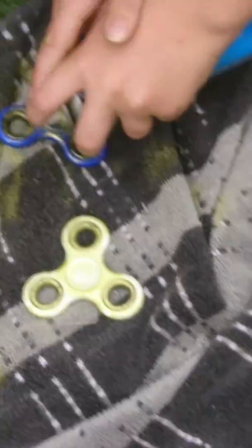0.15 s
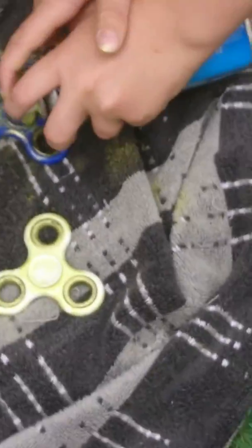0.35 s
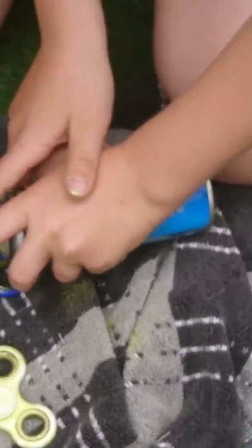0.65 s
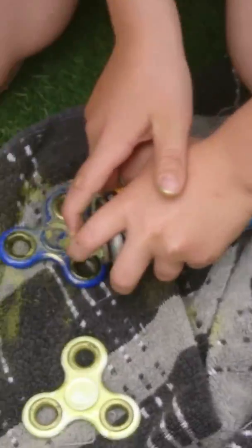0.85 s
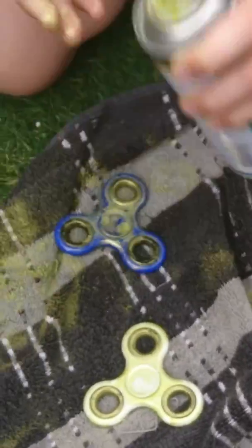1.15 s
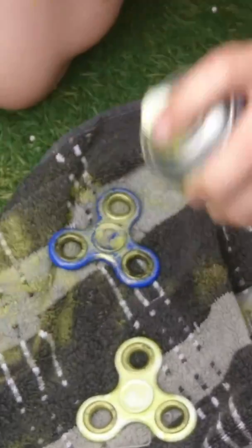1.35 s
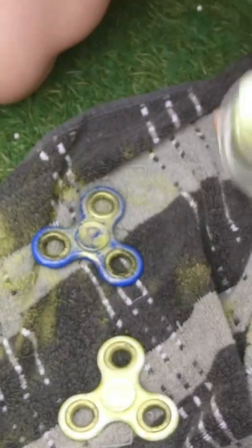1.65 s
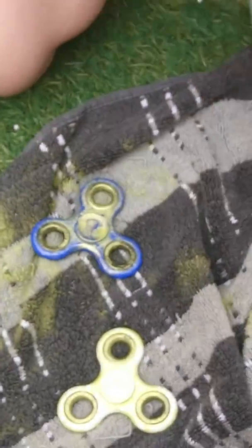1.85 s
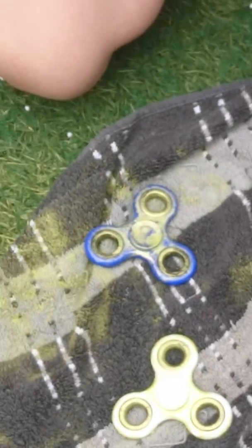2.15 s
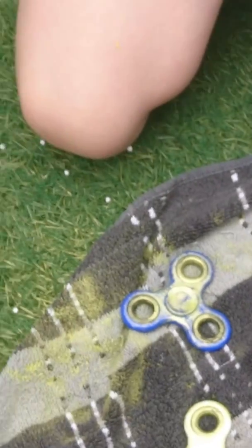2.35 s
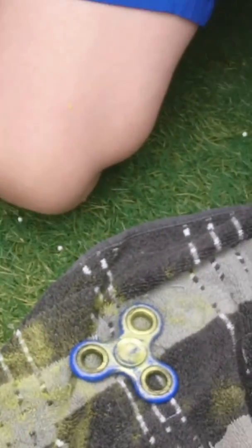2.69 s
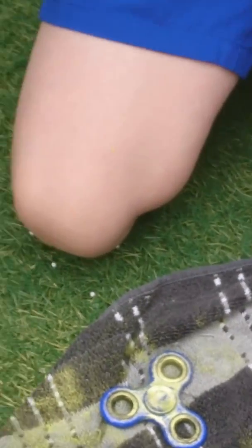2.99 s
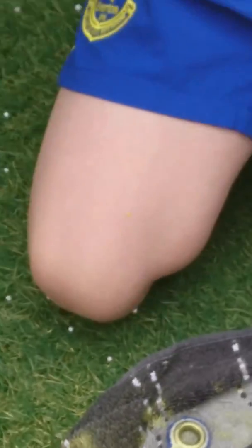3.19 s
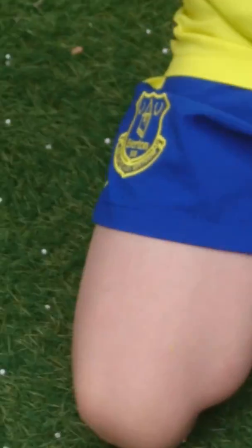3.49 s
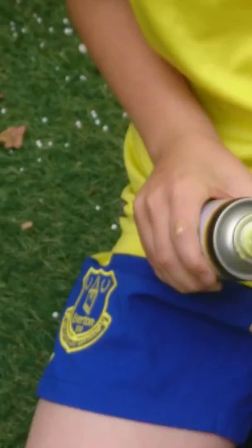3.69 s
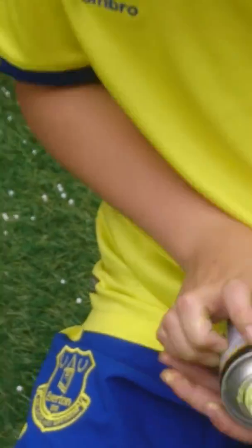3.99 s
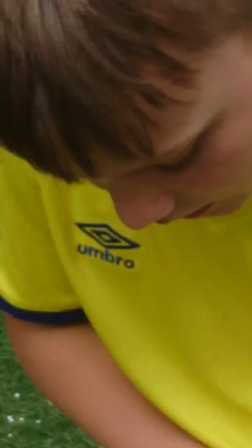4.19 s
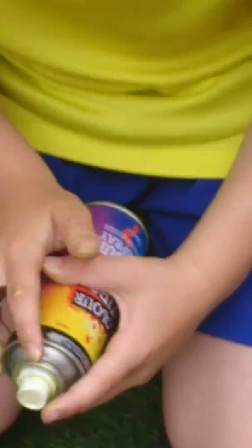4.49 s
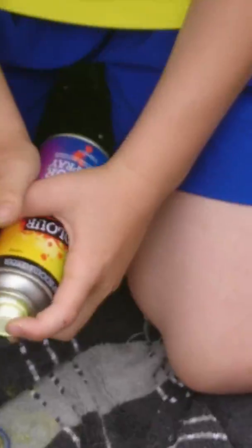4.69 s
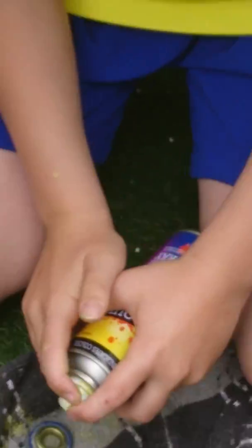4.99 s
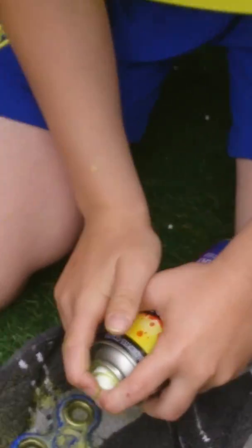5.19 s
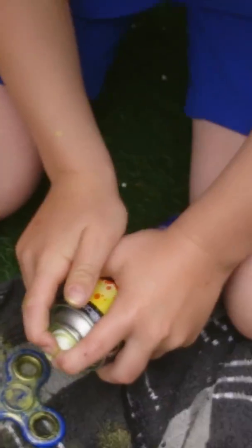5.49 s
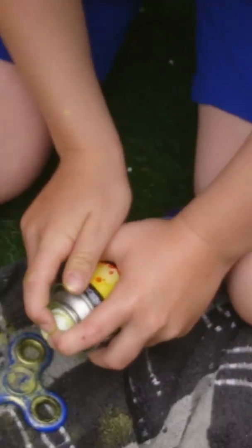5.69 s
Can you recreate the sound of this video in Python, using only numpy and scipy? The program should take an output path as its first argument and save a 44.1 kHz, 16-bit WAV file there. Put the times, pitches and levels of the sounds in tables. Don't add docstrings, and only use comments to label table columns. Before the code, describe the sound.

A loose ball knocks inside a spray can very near the microphones: hard, dry, high metallic clacks mixed with lower, duller side-wall knocks and short scraping rolls. Strokes come in uneven bursts after a quiet first second, thinning after 3.7 seconds. Behind are low road drone, thin leaf rustle, tiny bird chirps and soft air bumps; a faint hiss comes near the end.

```python
import sys
import numpy as np
from scipy import signal
from scipy.fft import rfft, irfft
from scipy.io import wavfile
from scipy.ndimage import uniform_filter1d, map_coordinates

SR = 44100
rng = np.random.default_rng(int(sys.argv[2]) if len(sys.argv) > 2 else 0)


def dump_mix(stems):
    frames = np.atleast_2d(stems).T
    limited = np.clip(frames, -1, 1)
    pcm = np.round(limited * 32767).astype(np.int16)
    wavfile.write(sys.argv[1], SR, pcm)


def ratio(d):
    e = np.asarray(d, float) / 20
    return 10 ** e


N = 257673


def unit(x):
    return x / np.sqrt(np.mean(x ** 2) + 1e-20)


def peak_one(x):
    return x / np.abs(x).max(axis=1, keepdims=True)


def along(points, hz):
    f, v = np.transpose(points)
    return np.interp(np.log(hz + 1), np.log(f + 1), v)


def curves(rows):
    s, *columns = np.transpose(rows)
    return [np.interp(np.arange(N) / SR, s, column, -120, -120) for column in columns]


def wobble(rate):
    knots = rng.standard_normal(int(N * rate / SR) + 4)
    return map_coordinates(knots, [np.arange(N) * rate / SR])


def swell(start, attack, hold, fade_db):
    t = np.arange(N) / SR - start
    return np.clip(t / attack, 0, 1) * ratio(-fade_db * np.maximum(t - hold, 0))


def coloured(x, spectrum):
    cepstrum = irfft(np.log(ratio(along(spectrum, np.fft.rfftfreq(4096, 1 / SR)))))
    cepstrum[1:2048] *= 2
    cepstrum[2049:] = 0
    pulse = irfft(np.exp(rfft(cepstrum)))[:x.shape[1]]
    pulse = pulse[None] / np.linalg.norm(pulse)
    return signal.fftconvolve(x, pulse, axes=1)[:, :x.shape[1]]


def rush(spectrum, alike, patchy_db):
    z = signal.stft(rng.standard_normal((2, N)), nperseg=512)[2]
    field = uniform_filter1d(rng.standard_normal(z.shape[1:]), size=6, axis=0)
    field = uniform_filter1d(field, size=20, axis=1)
    patches = ratio(np.clip(patchy_db, 0, 3) * unit(field))
    noise = signal.istft(z * patches, nperseg=512)[1][:, :N]
    a, b = coloured(noise, spectrum)
    turn = np.arccos(np.clip(alike, 0, 1)) / 2
    left = np.cos(turn) * a + np.sin(turn) * b
    right = np.cos(turn) * a - np.sin(turn) * b
    return unit(np.array([left, right]))


# t/s, roar level/dB, rumble level/dB
AIR = [(0, -58, -66.5), (.5, -62, -60.5), (2.2, -60, -70), (4.2, -57.5, -60.5), (5, -56.5, -60),
       (5.84, -52.5, -57.5)]
# t/s, f/Hz, level/dB, overtone level/dB
ENGINE = [(0, 51, -90, -100), (.6, 56.1, -59.5, -59), (1.5, 58.4, -62.5, -104), (2.3, 51.8, -60, -59.5),
          (2.7, 54.2, -80, -63), (3.06, 51.8, -66, -54), (3.5, 56.3, -53.5, -78), (3.85, 58.5, -62.5, -64),
          (4.15, 48.2, -99, -92), (4.5, 47.65, -72, -59), (4.9, 49.05, -54.5, -56), (5.4, 52, -50, -54.5),
          (5.84, 52, -48.5, -51)]
# t/s, f/Hz, level/dB
SECOND_TONE = [(0, 67.3, -74), (1.3, 70, -69), (1.6, 65.6, -74), (4.2, 59, -93.5), (4.45, 66.2, -56),
               (5.1, 75.9, -60), (5.84, 82, -63.5)]
# f/Hz, level/dB per Hz
ROAR = [(76, -31.5), (130, -10), (466, -5.5), (556, -9), (688, -5.5), (900, -9.5), (1190, -11), (1450, -14),
        (2380, -25.5), (2950, -36.5), (9000, -53.5), (11700, -91.5), (19800, -120)]
# f/Hz, level/dB per Hz
RUMBLE = [(22, -40), (40, -10.5), (65, -2), (110, -19.5), (160, -17), (300, -46.5)]


def traffic():
    roar_db, rumble_db = curves(AIR)
    hz, db, over_db = curves(ENGINE)
    turn = 2 * np.pi * np.cumsum(hz + 0.6 * wobble(4)) / SR
    tones = ratio(db + 4.5 + 1.1 * wobble(2.2)) * np.sin(turn)
    tones += ratio(over_db - 4 + 3.5 * wobble(18)) * np.sin(2 * turn)
    hz, db = curves(SECOND_TONE)
    turn = 2 * np.pi * np.cumsum(hz + 0.8 * wobble(5)) / SR
    tones += ratio(db + 3 + 2.5 * wobble(7)) * np.sin(turn)
    rumble = ratio(rumble_db + 1 + 2 * wobble(7)) * rush(RUMBLE, alike=0.8, patchy_db=2)
    roar = ratio(roar_db - 2 + wobble(3.2)) * rush(ROAR, alike=0.35, patchy_db=1.5)
    return (tones + rumble) * ratio([[-4], [2.8]]) + roar * ratio([[-2], [2]])


# t/s, level/dB
RUSTLE = [(0, -63), (.5, -69), (.9, -67), (.97, -64.5), (1.08, -59), (4.3, -60.5), (4.75, -70),
          (4.95, -73.5), (5.84, -83.5)]
# f/Hz, level/dB per Hz
LEAVES = [(1200, -32), (1700, -6.5), (3000, -6), (6000, -8.5), (7400, -8), (8400, -22.5), (10000, -26.5),
          (12500, -26.5), (14500, -53.5)]


def leaves():
    return ratio(curves(RUSTLE)[0]) * rush(LEAVES, alike=0.084, patchy_db=6.5)


# start t/s, length t/s, wall level/dB, dome level/dB re wall
ROLLS = [(-.03, 0.027, -59, -33), (0.097, 0.051, -54, -0.5), (1.144, 0.38, -48, 4),
         (1.592, 0.067, -48, 13.5), (1.772, 0.22, -48, 5), (2.098, 0.19, -57.5, -3.5),
         (2.356, 0.18, -45.5, 1.5), (2.904, 0.04, -36.5, 9), (3.14, 0.17, -51.5, 1.5),
         (3.356, 0.42, -39.5, 0), (3.86, 0.07, -49.5, 3), (4.035, 0.3, -61, -14), (4.424, 0.023, -48.5, 5),
         (4.612, 0.036, -53.5, -0.5)]
# t/s, f/Hz
GRIP = [(0, 2230), (1.12, 2400), (1.351, 2553), (1.44, 2260), (1.601, 2485), (2.1, 2360), (2.64, 2400),
        (2.72, 3060), (2.78, 2080), (2.87, 1890), (3.001, 2110), (3.18, 2030), (3.67, 2205), (3.9, 2570),
        (4.449, 2610), (4.619, 2354)]
# f/Hz, level/dB
DOME = [(3500, -36), (4000, -16), (4680, -10), (5200, -6.5), (5370, -12), (5800, -17.5), (6020, -11.5),
        (6200, -4), (6380, -7), (6700, -16), (7250, -10), (7500, -5), (7890, -17), (8500, -15.5),
        (9300, -11.5)]


def rolling():
    attack_s, fade_db_per_s = 0.036, 243
    slides = np.array([ratio(db) * swell(s, attack_s, length, fade_db_per_s) for s, length, db, _ in ROLLS])
    unevenness_db = np.minimum(2.5 * wobble(90) + 4 * wobble(500), 8)
    scrape = rng.standard_normal((2, N)) * ratio(unevenness_db)
    ends = coloured(scrape, [(1500, -48)] + DOME + [(12000, -23), (15500, -21), (16200, -73)])
    side = coloured(scrape, [(250, -31.5), (600, -13), (2000, -16), (2500, -6), (3100, -15), (9000, -61.5)])
    free_hz = np.interp(np.arange(N) / SR, *np.transpose(GRIP))
    sing = np.array([wobble(110), wobble(110)]) * np.sin(2 * np.pi * np.cumsum(free_hz) / SR)
    dome_gain = ratio(np.transpose(ROLLS)[-1]) @ slides
    wall_gain = slides.sum(axis=0)
    return dome_gain * unit(ends) + wall_gain * (unit(side) + 0.49 * unit(sing))


def ring(modes, t, t60, scatter_db, detune):
    hz, db = np.transpose(modes)
    count = len(hz)
    not_first = np.arange(count) > 0
    hz = hz * (1 + detune * rng.standard_normal(count) * not_first)
    gain = ratio(db + scatter_db * rng.standard_normal((2, count)))
    phase = rng.uniform(0, 2 * np.pi, count) + 1.25 * rng.standard_normal((2, count))
    life = t60 * np.exp(0.12 * rng.standard_normal(count))[:, None]
    fade = ratio(-60 * t[:, None] / life)
    tones = np.sin(2 * np.pi * hz[:, None] * t[:, None] + phase[..., None])
    return np.sum(gain[..., None] * fade * tones, axis=1)


def rebounds(x, loss_db):
    skips = np.zeros((1, 600))
    skips[0, 0] = 1
    later = np.cumsum(rng.integers(70, 190, size=3))
    skips[0, later] = ratio(-loss_db * np.arange(1, 4) + 3 * rng.standard_normal(size=3))
    return signal.fftconvolve(x, skips, axes=1)


# f/Hz, level/dB per Hz
SPLASH = [(1500, -65), (3500, -3.5), (6000, 4), (9000, -1), (12000, -2), (15500, -11.5), (16500, -32),
          (19000, -64.5)]


def dome(t, grit, db, hz):
    rise = 1 - np.exp(-t / 0.00035)
    shell = peak_one(rise * ring(DOME, t, 0.0065, scatter_db=4.5, detune=0.022))
    place = [(hz, 0), (0.95 * hz, -4), (1.06 * hz, -4)]
    struck = peak_one(rise * ring(place, t, 0.0052, scatter_db=1, detune=0.023))
    crack = peak_one(rise * coloured(grit * ratio(-60 * t / 0.0069), SPLASH))
    burst = peak_one(0.75 * shell + 1.2 * struck + ratio(-5.5 - 0.24 * db) * crack)
    wet_db = -4.5
    return ratio(1.5) * rebounds(burst, loss_db=12), wet_db


# f/Hz, level/dB
WALL = [(1950, -23.5), (2200, -6.5), (2420, -12.5), (2640, -5), (3060, -10.5)]
# f/Hz, level/dB per Hz
THUD = [(40, -59.5), (200, -19), (450, -3), (1000, -0.5), (1700, 1.5), (3500, -3), (8000, -13)]


def wall(t, grit, hz, thud_db):
    rise = 1 - np.exp(-t / 0.00077)
    free = peak_one(rise * ring([(hz, 0), (1.06 * hz, -7)], t, 0.025, scatter_db=3.5, detune=0.04))
    neighbours = peak_one(rise * ring(WALL, t, 0.027, scatter_db=6.5, detune=0.05))
    thud = peak_one(rise * coloured(grit * ratio(-60 * t / 0.028), THUD))
    blow = 0.56 * free + 0.42 * neighbours + ratio(thud_db + 8) * thud
    wet_db = -9
    return ratio(2.5) * rebounds(blow, loss_db=11.5), wet_db


# f/Hz, time to fall 60 dB t/s
AFTER = [(300, 0.14), (2400, 0.28), (4600, 0.1028), (6200, 0.14), (9000, 0.12), (14000, 0.14)]


def linger(x):
    hz = np.fft.rfftfreq(256, 1 / SR)
    t = np.arange(56) * 128 / SR
    re, im = rng.standard_normal((2, 2, len(hz), len(t)))
    fade = np.exp(-np.log(1000) * t / along(AFTER, hz)[:, None])
    tail = signal.istft((re + 1j * im) * fade, SR, nperseg=256)[1]
    tail = tail / np.linalg.norm(tail, axis=1, keepdims=True)
    return signal.fftconvolve(x, tail, axes=1)


# t/s, left leads by t/ms, left-right level/dB
BEARING = [(0, 0.15, -4.5), (1.1, 0.14, -3), (1.602, 0.11, -3.5), (1.9, 0.11, -4), (2.199, 0.26, -4.5),
           (2.502, 0.29, -1), (3.2, 0.3, -2), (3.55, 0.21, -2), (4.001, 0.025, -7.5), (5.84, 0.0085, 6)]
# t/s, peak level/dB, f/Hz, left-right level/dB
ENDS = [(0.0102, -49, 4560, -8), (0.056, -52, 6500, -7), (0.0819, -13, 7140, -2.5),
        (0.1454, -38, 6600, -11), (0.2205, -33, 6700, -5), (0.235, -43, 6660, -2),
        (0.6474, -51.5, 7150, -9), (1.1121, -17.5, 7800, -8), (1.1466, -31, 6240, 5),
        (1.162, -36, 6030.0, -8), (1.17, -39, 7720, -8), (1.1955, -2, 6970, -9), (1.1994, -3, 5840, 3),
        (1.2035, -10, 5880, 9), (1.2175, -15, 6100, 7), (1.2362, -6, 5760, -7), (1.2422, -14.5, 6060, 6),
        (1.248, -16, 7500, -5), (1.322, -20.5, 5640, 0.5), (1.3344, -23, 7660, -11),
        (1.394, -26.5, 7770, -10), (1.4348, -23, 7900, -12), (1.465, -20, 7650, -10),
        (1.476, -20, 7500, -5.5), (1.5038, -29, 5320.0, 5), (1.531, -19.5, 7500, -10),
        (1.5417, -15, 7440, -5.5), (1.5489, -19.5, 7840, -6), (1.5514, -24.5, 7560, -6),
        (1.5908, -10.5, 7330, -10.5), (1.6006, -1.5, 7740, -9), (1.6046, -5, 6050, 6.5),
        (1.6102, -15.5, 6100, 9), (1.615, -7, 7700, -6), (1.6199, -10.5, 7900, -11.5),
        (1.6239, -7.5, 6200, -1), (1.6282, -17, 6500, 2), (1.469, -22, 7860, -7.5), (1.6698, -4, 5436, 2),
        (1.6746, -15.5, 6200, 11.5), (1.6876, -17.5, 7150, -5.5), (1.7059, -16.5, 6970, -10),
        (1.738, -22, 6300, 1.5), (1.7677, -2.5, 7680.0, -12.5), (1.778, -17.5, 7700, 2),
        (1.873, -16.5, 6130, 1), (1.8929, -19, 7250, -15),
        (1.9042, -22, 6180.0, -1), (1.926, -25.5, 6150.0, -4), (1.9738, -27, 6120.0, 0),
         (2.028, -38.5, 6990.0, -14), (2.086, -18, 5240.0, 3.5), (2.0943, -30.5, 7530.0, -7),
         (2.3578, -21, 5350.0, 8), (2.368, -19, 4670.0, 4), (2.3884, -22, 7070.0, -6),
         (2.3987, -28, 6030.0, 14), (2.443, -4, 6220.0, 13), (2.4482, -1.5, 6240.0, -6),
         (2.4544, -6.5, 6210.0, -10.5), (2.461, -8, 6480.0, 4.5), (2.4719, -22, 6290.0, 0),
         (2.5323, 1.5, 6060.0, 3.5), (2.5376, -24, 5990.0, -7), (2.546, -4.5, 6030.0, -7),
         (2.55, -17, 5920.0, 1), (2.556, -27, 5900.0, 0), (2.6352, -6, 6190.0, -1),
         (2.64, -8.5, 7850.0, -4), (2.6401, -39.5, 6290.0, 6.5), (2.6466, -8.5, 6440.0, 4),
         (2.652, -32, 6340.0, -3.5), (2.6549, -2.5, 6290.0, -11), (2.6653, -5.5, 6430.0, 8),
         (2.6778, -13, 5380.0, -0.5), (2.711, -21.5, 8120.0, -8), (2.73, -12.5, 5610.0, 1),
         (2.7549, -11, 5950.0, -1.5), (2.7678, -13, 6200.0, 3), (2.7815, -16, 7910.0, -11),
         (2.792, -18, 7390.0, 3.5), (2.8736, -20, 4940.0, 0.5), (2.9041, -0.5, 6060.0, 0.5),
         (2.908, -3, 6070.0, 1), (2.9155, -4, 6090.0, -4.5), (2.9317, -7.5, 5880.0, -5.5),
         (2.951, -17, 5790.0, 6), (2.9608, -19, 5870.0, 5.5), (2.989, -15, 5180.0, 1),
         (2.9997, -21, 7000.0, -7), (3.0999, -17.5, 5540.0, -0.5),
        (3.14, -6, 6090, -5.5), (3.143, -2.5, 5940, 1.5), (3.151, -10, 6100, -2.5), (3.1897, -6, 5580, -1),
         (3.2199, -3, 6280, -1.5), (3.298, -25, 7350, -8.5), (3.3395, -3, 5430, 0.5),
         (3.3418, -0.5, 5730, -5.5), (3.3613, 1, 5440, -3), (3.3967, -5, 5920, -2.5),
         (3.4034, -6.5, 5740, 1.5), (3.4055, -4.5, 5630, -3.5), (3.4143, -7, 5750, -6),
         (3.4475, -21.5, 7050, -12), (3.4877, -12, 6220, 3.5), (3.545, -4.5, 7070, -9.5),
         (3.5481, -6, 5940, 0.5), (3.557, -4.5, 5790, 1.5), (3.5597, -1.5, 5660, -2),
         (3.5692, -8.5, 6100, -8), (3.5987, -14, 6500, -7), (3.615, -7, 6480, 5.5), (3.6246, -3, 5830, -14),
         (3.6348, -35, 6000, -6), (3.6678, -12.5, 9520, -6.5), (3.6704, -9.5, 5800, 0),
         (3.6778, -16, 5910, -1.5), (3.7159, -20, 5300, 4), (3.7802, -32, 5830, 0),
         (4.0364, -19.5, 5400, 1), (4.0805, -24.5, 5680, -2.5), (4.2557, -52, 4800, -5.5),
         (4.3888, -26, 5830, -6), (4.4353, -32, 7500, -11), (4.5103, -39, 5330, -2),
         (4.6157, -33.5, 7190, -10),
        (3.0872, -24, 5300, -2),
    (3.905, -34, 7790, -1),
    (4.1105, -31, 5600, -4),
    (4.4575, -35.5, 7800, -11),
    (4.563, -41, 7190, -6),
    (4.63, -49, 7240, -2),
]
# t/s, ring level/dB, f/Hz, thud level/dB re ring
SIDES = [(0.081, -26.5, 2260, -21), (0.11, -39, 2440, -6), (0.222, -45, 2230, -7.5),
         (1.1117, -23, 2320, -12.5), (1.146, -29, 2350, -13.5), (1.1612, -31.5, 2415, -28),
         (1.1944, -24, 2700, -3), (1.2418, -21, 2270, -13.5), (1.249, -23.5, 2130, -4.5),
         (1.256, -19, 2230, -18.5), (1.3205, -26, 2470, -9), (1.3951, -29.5, 2490, -10),
         (1.434, -20, 2230, -11.5), (1.5414, -28, 2570, -4.5), (1.59, -13, 2356, -17),
         (1.6679, -25.5, 2720, 3.5), (1.6892, -21.5, 2530, -12), (1.706, -22.5, 2420, -26),
         (1.7385, -30.5, 3010.0, -1.5), (1.7667, -22, 2490, -1.5), (1.798, -22, 2500, -16.5),
         (1.8728, -28.5, 2285, -8), (1.893, -31, 2050, -6.5), (2.029, -41.5, 2600, -6.5),
         (2.0854, -30.5, 2700, -2.5), (2.0945, -34, 2300, -10.5), (2.3561, -24, 2560, -5),
         (2.3674, -24.5, 2280, -13.5), (2.3877, -28, 2490, -29), (2.3982, -26, 2460, -17.5),
         (2.4453, -16.5, 2504, -16.5),
         (2.532, -22.5, 2290, -6.5), (2.5451, -25.5, 2300, -15), (2.635, -24.5, 2140, -10.5),
           (2.6545, -24.5, 2150, -6), (2.7112, -19, 3240, -19.5), (2.7291, -34, 2660.0, -13.5),
           (2.7538, -33, 3160, -12), (2.7692, -23, 2120, -6), (2.7874, -23.5, 1870, -6),
           (2.8737, -18, 1950, -13), (2.9049, -19.5, 3350, -9), (2.9167, -23, 2200, -10.5),
           (2.9495, -29, 2800, -1.5), (2.9898, -25, 2050, -7), (2.996, -23, 2100, -15.5),
           (3.086, -36.5, 2540.0, -1), (3.1003, -19.5, 2100, -12), (3.1409, -13, 2364, -12.5),
           (3.1547, -16.5, 2426, -14), (3.1818, -18, 1883, -10), (3.2199, -30, 2450, -3),
           (3.3397, -24, 2490, -8.5), (3.3831, -18.5, 2245, -9), (3.4881, -41, 2203, -19),
           (3.5446, -30.5, 3150, -0.5), (3.5992, -22.5, 2380, -13), (3.6077, -22, 2380, -15),
           (3.6686, -14.5, 2200, -17), (3.6774, -22, 2430, -4), (3.716, -18.5, 2357, -7),
           (3.7889, -34.5, 2405, -17), (3.9047, -39.5, 2570, -6), (4.0371, -24, 2540, -6),
           (4.0834, -29.5, 2570, -11), (4.1106, -31.5, 2530, -18), (4.1324, -39.5, 2490, -12),
           (4.3889, -30, 2584, -10), (4.5097, -46, 2540, -11), (4.5635, -42, 2585, -14.5),
           (4.615, -41.5, 2400, -13), (5.2748, -47.5, 2330, -17.5),
         (.012, -46.5, 2270, -29),
    (1.503, -36, 2280, -5.5),
    (1.601, -27, 2594, -1),
    (1.6229, -19, 2440, -9.5),
    (4.4359, -31.5, 2560, -21),
    (4.4566, -32, 2580, -26),
    (4.647, -47, 2290, -15),
    (4.7135, -46.5, 2400, -9),
]


def knocks():
    out, send = np.zeros((2, 2, N + SR))
    at, lead_ms, side_db = np.transpose(BEARING)
    rows = [(s, db, hz, pan_db, None) for s, db, hz, pan_db in ENDS]
    for s, db, hz, thud_db in SIDES:
        rows.append((s, db, hz, np.interp(s, at, side_db), thud_db))
    for s, db, hz, pan_db, thud_db in rows:
        lead = round(np.clip(np.interp(s, at, lead_ms), 0, 0.7) * SR / 1000)
        late = np.arange(640) - np.array([[0], [lead]])
        t = np.maximum(late, 0) / SR
        shared = rng.standard_normal(640 + 32)
        shared = np.array([shared[32:], shared[32 - lead:][:640]])
        grit = (shared + 0.92 * rng.standard_normal(t.shape)) * (late >= 0)
        if thud_db is None:
            hit, wet_db = dome(t, grit, db, hz)
        else:
            hit, wet_db = wall(t, grit, hz, thud_db)
        hit = hit * ratio(db + pan_db * np.array([[0.5], [-0.5]]))
        start = round(s * SR)
        stop = start + hit.shape[1]
        out[:, start:stop] += hit
        send[:, start:stop] += ratio(wet_db) * hit
    for start in range(0, N, 3072):
        piece = send[:, start:start + 3072]
        if piece.any():
            tail = linger(piece)
            out[:, start:start + tail.shape[1]] += tail
    return out[:, :N]


# t/s, level/dB
PUFFS = [(0.558, -53), (0.65, -55), (0.728, -53), (0.78, -60), (1.015, -58), (1.201, -53.5), (1.604, -53),
         (1.76, -44), (1.665, -52), (3.667, -55), (2.449, -49), (2.631, -55), (2.909, -57.5), (3.538, -51)]


def puffs():
    out = np.zeros((2, N + SR))
    t = np.arange(3000) / SR
    shape = (t / 0.0099) * np.exp(1 - t / 0.0061)
    for s, db in PUFFS:
        noise = rng.standard_normal((1, len(t)))
        noise = coloured(noise, [(60, -20.5), (130, 3), (300, -16.5), (900, -52)])
        lump = np.sin(2 * np.pi * 82 * t) + 0.34 * unit(noise)
        out[:, round(s * SR):][:, :len(t)] += ratio(db + 9) * lump * shape * ratio([[-12], [4]])
    return out[:, :N]


# t/s, length t/s, from f/Hz, to f/Hz, level/dB
BIRDS = [
    (0.706, 0.083, 3900, 3760, -88),
    (0.809, 0.16, 4385, 2934, -80),
    (4.727, 0.19, 4106, 3068, -77),
    (5.09, 0.15, 4490, 3374, -80),
    (5.373, 0.13, 3970, 4110, -80.5),
    (5.547, 0.08, 4130, 4400, -77.5),
]


def birds():
    out = np.zeros((2, N + SR))
    for s, length, from_hz, to_hz, db in BIRDS:
        u = np.linspace(0, 1, round(length * SR))
        blur = uniform_filter1d(rng.standard_normal((2, len(u))), size=115, axis=1)
        glide = np.sin(2 * np.pi * np.cumsum(from_hz + (to_hz - from_hz) * u) / SR)
        two_voices = np.cos(2 * np.pi * 380 * length * u)
        chirp = glide * unit(blur) * two_voices
        out[:, round(s * SR):][:, :len(u)] += ratio(db + 22.5) * np.sin(np.pi * u) * chirp
    return out[:, :N]


# f/Hz, level/dB per Hz
NOZZLE = [(1500, -15), (2500, -10), (3440, -12), (4200, -8), (6000, -10.5), (8300, -17), (9800, -15),
          (11700, -13.5), (13000, -22), (15000, -41)]


def nozzle():
    flow = ratio(-59.5 + 0.97 * wobble(8.2)) * swell(5.14, attack=0.0084, hold=0.026, fade_db=28.5)
    flow += ratio(-66.5) * swell(5.39, attack=0.023, hold=0.24, fade_db=8.2)
    return flow * rush(NOZZLE, alike=0.15, patchy_db=3) * ratio([[-2.5], [2.5]])


def scene():
    return traffic() + leaves() + rolling() + knocks() + puffs() + birds() + nozzle()


def roll_off(x):
    return signal.sosfilt(signal.butter(12, 17010, fs=SR, output="sos"), x)


# f/Hz, level/dB
MIC = [(15600, 0), (16400, -12), (17000, -30), (17400, -90)]


def record(dry):
    held = dry / (1 + np.abs(dry / 0.88) ** 6) ** (1 / 6)
    heard = 0.77 * coloured(held, MIC)
    return roll_off(heard)


dry = scene()
out = record(dry)
dump_mix(out)
```